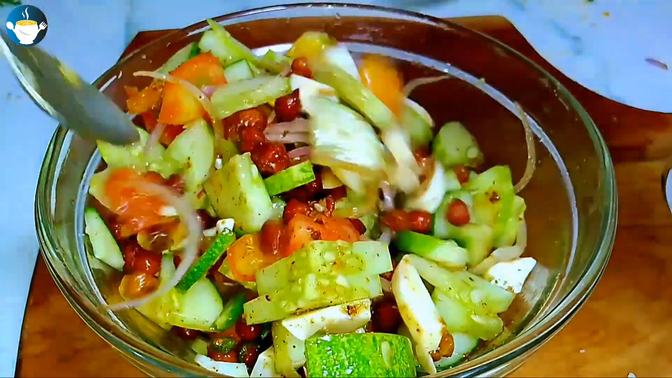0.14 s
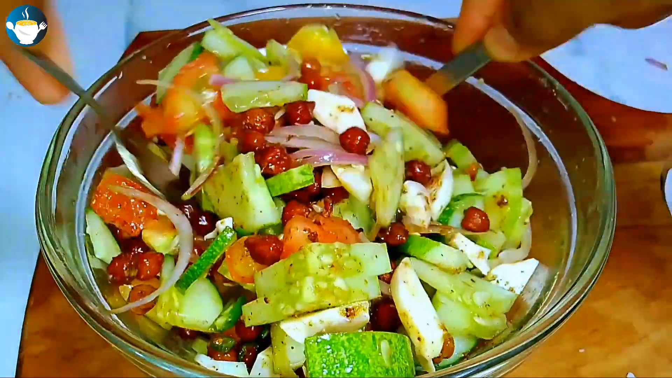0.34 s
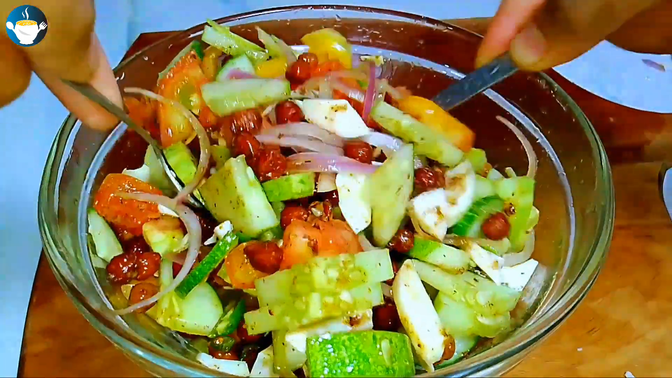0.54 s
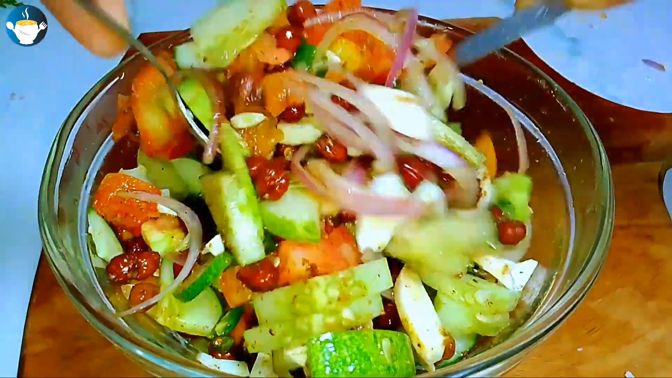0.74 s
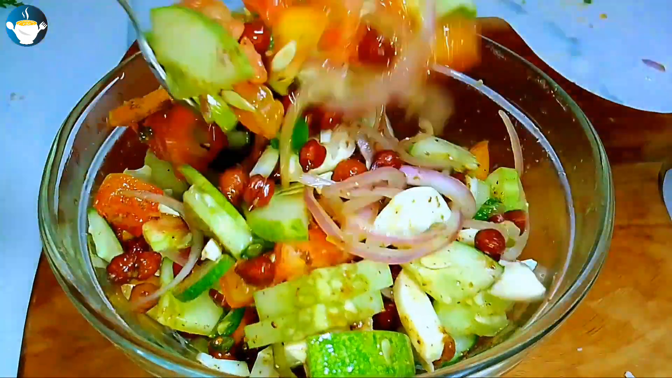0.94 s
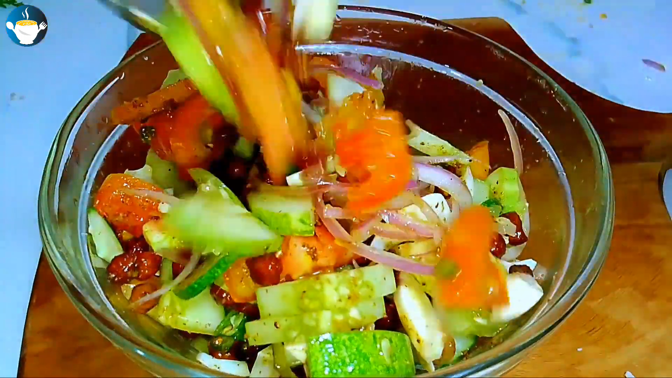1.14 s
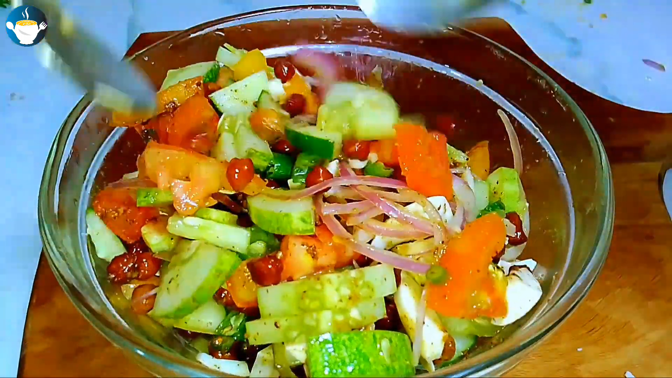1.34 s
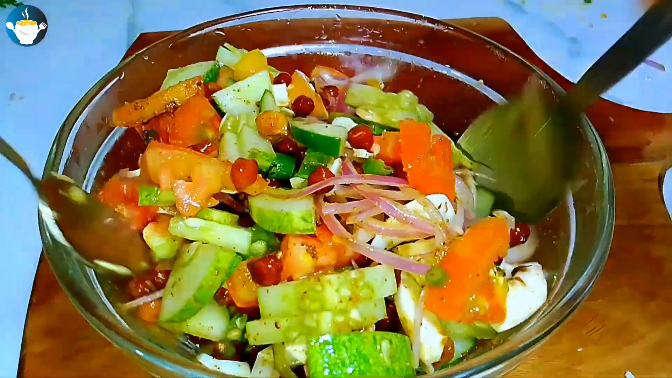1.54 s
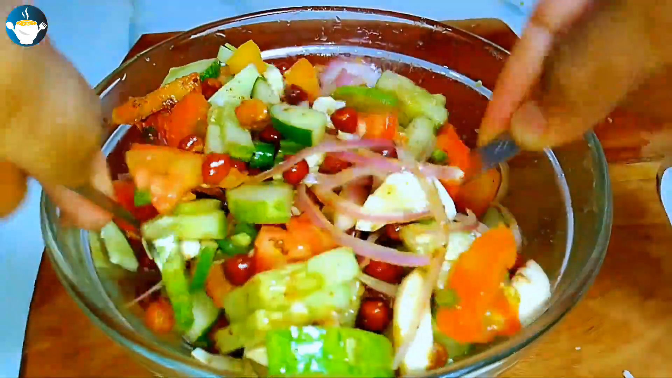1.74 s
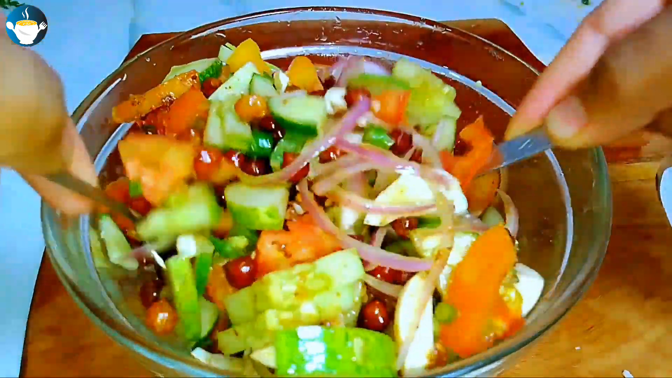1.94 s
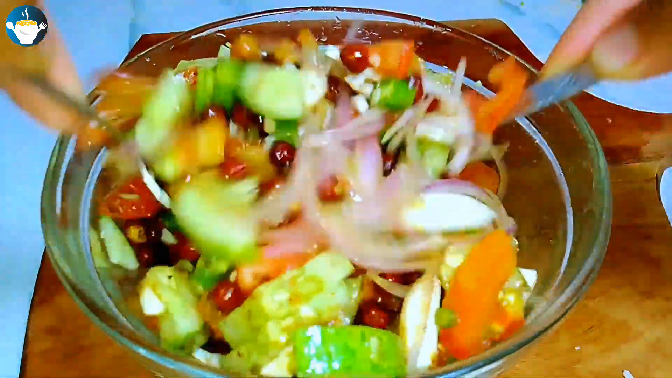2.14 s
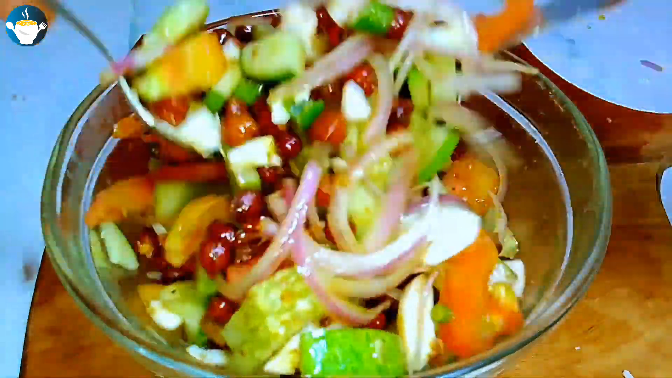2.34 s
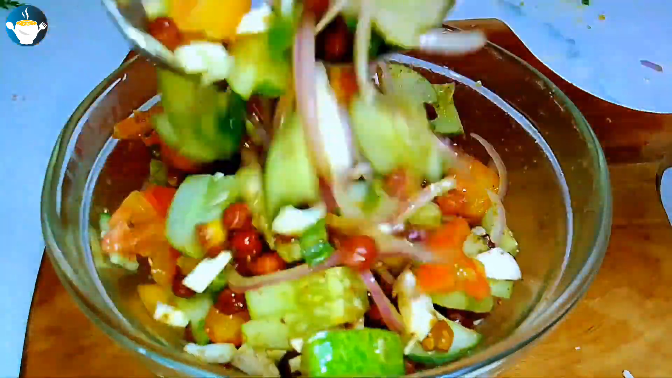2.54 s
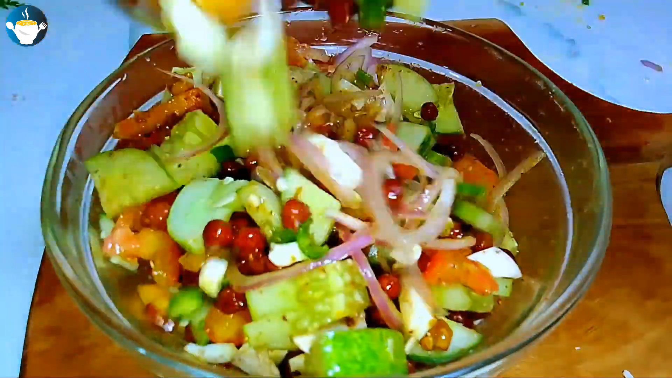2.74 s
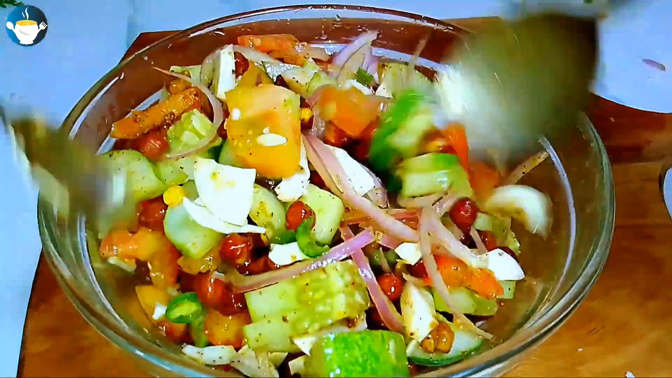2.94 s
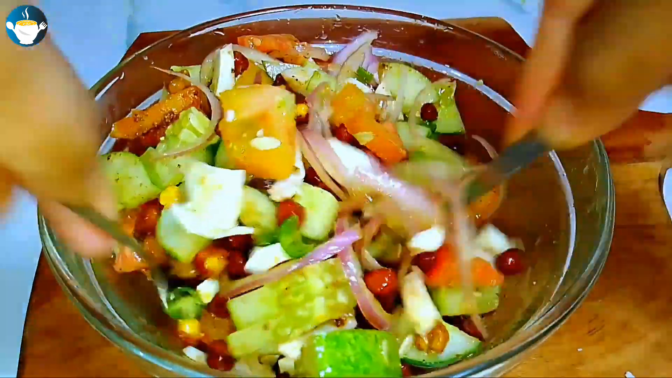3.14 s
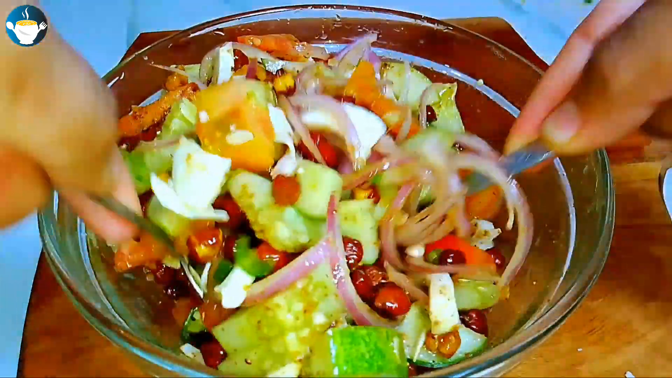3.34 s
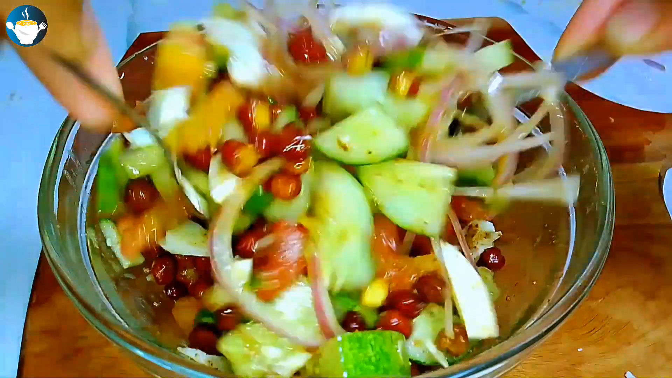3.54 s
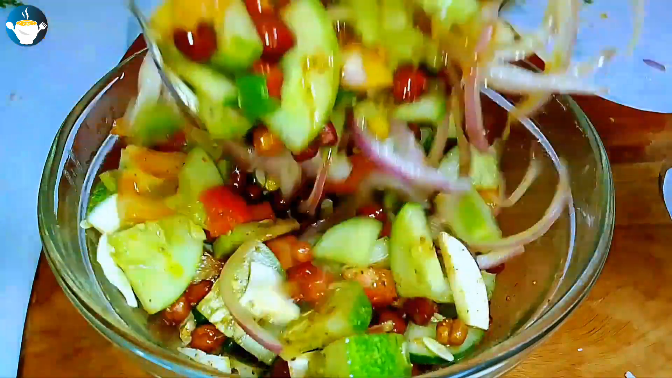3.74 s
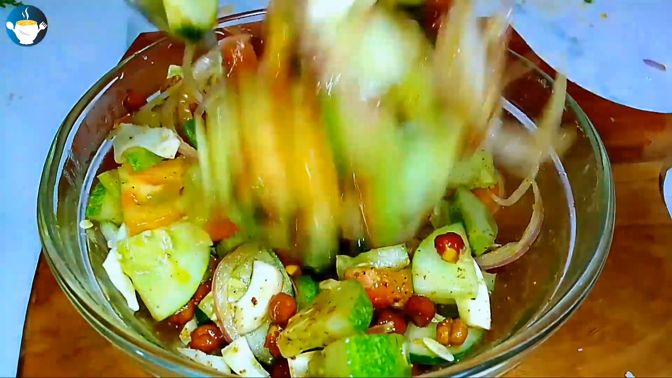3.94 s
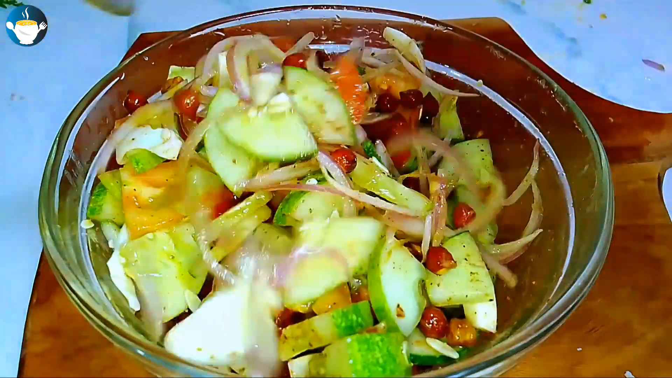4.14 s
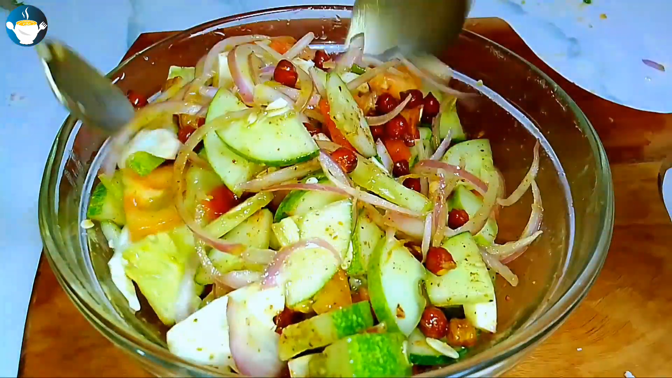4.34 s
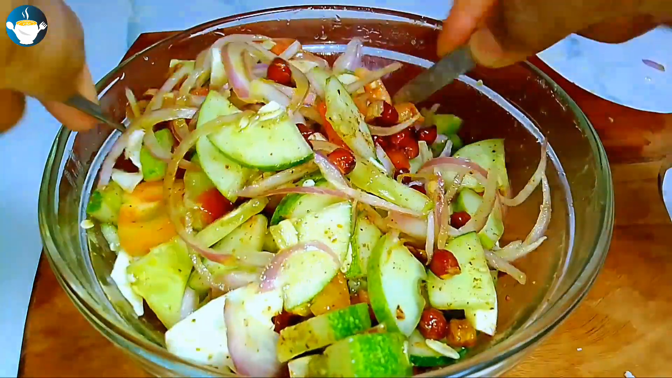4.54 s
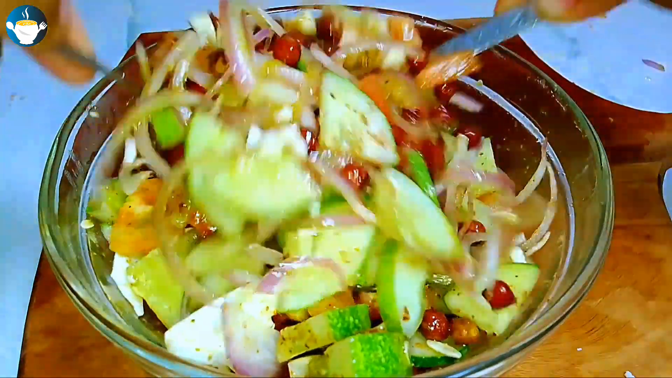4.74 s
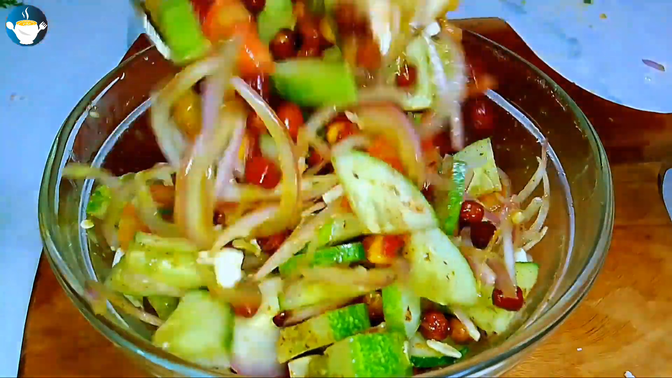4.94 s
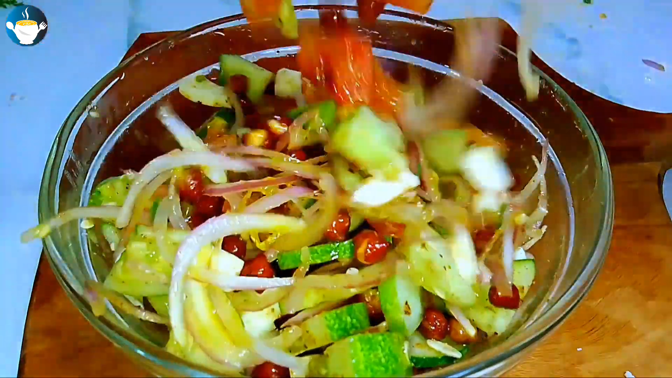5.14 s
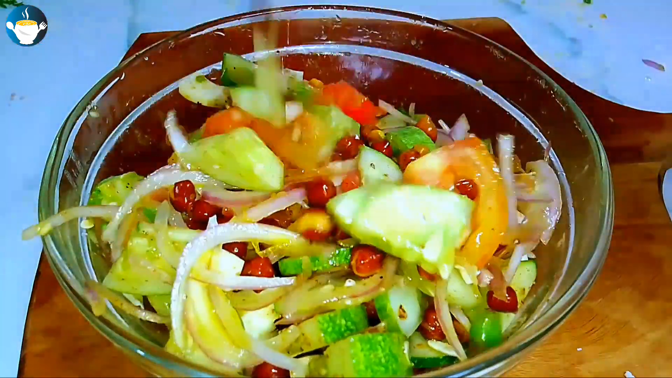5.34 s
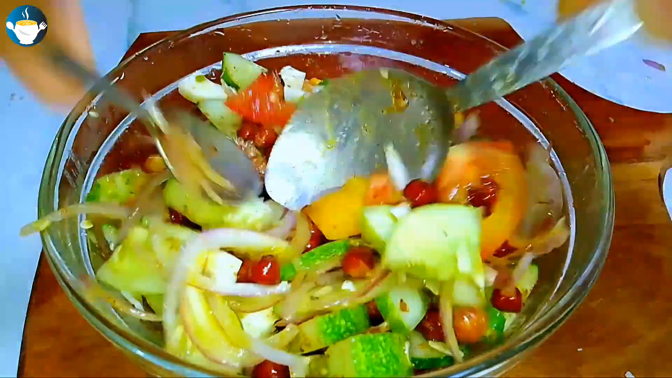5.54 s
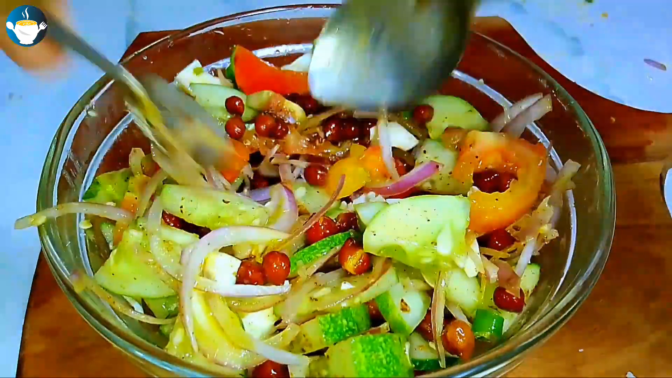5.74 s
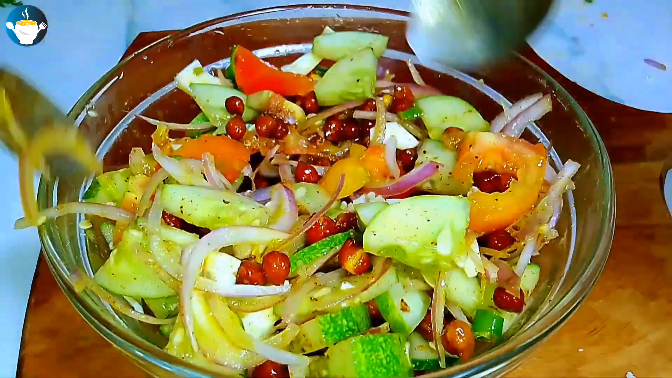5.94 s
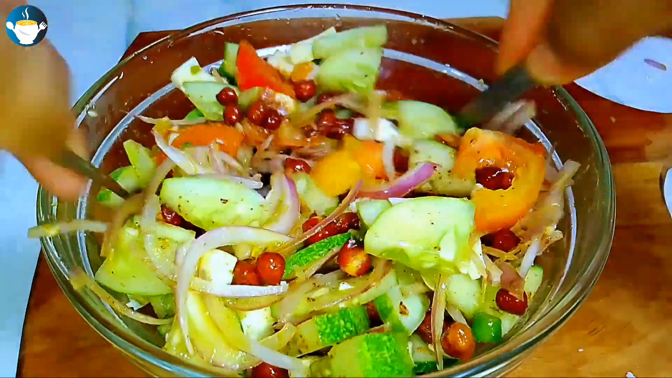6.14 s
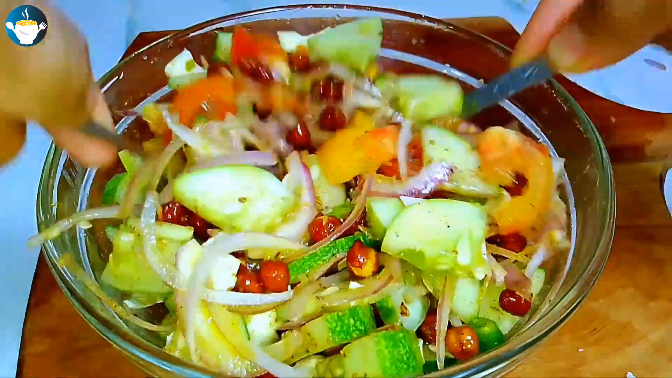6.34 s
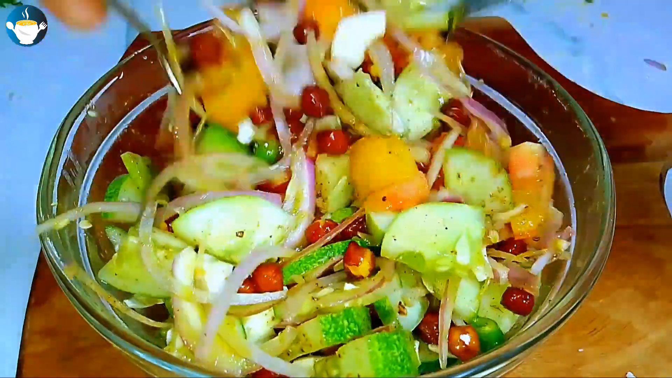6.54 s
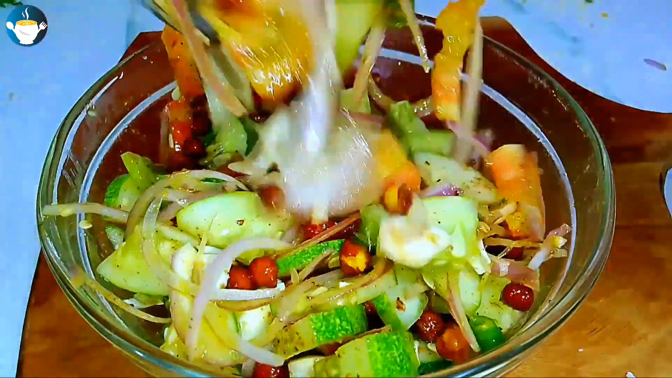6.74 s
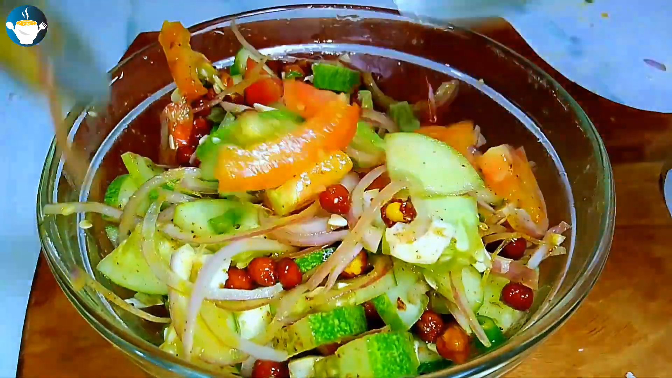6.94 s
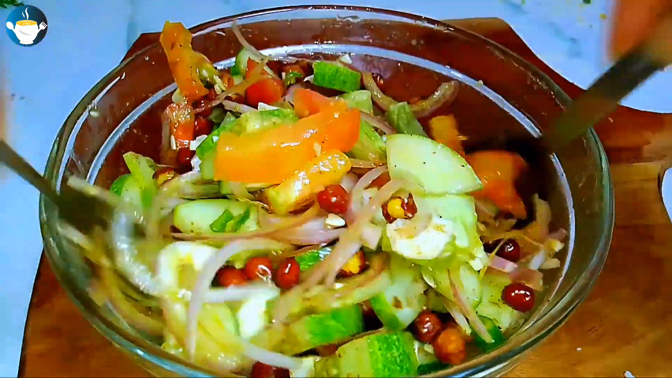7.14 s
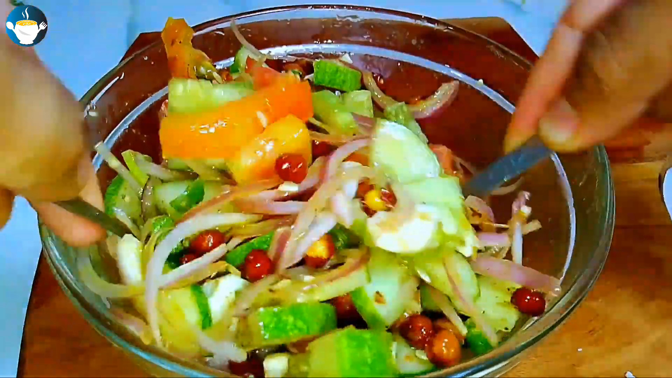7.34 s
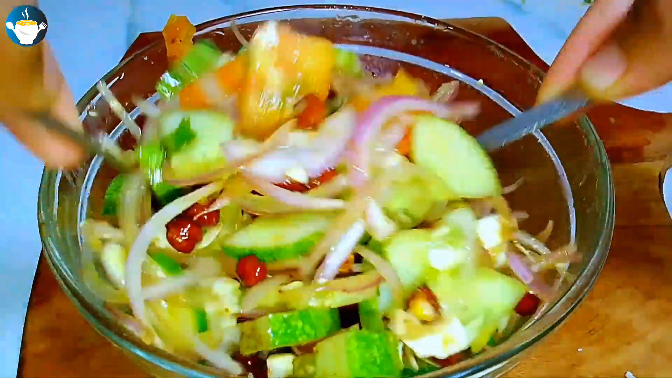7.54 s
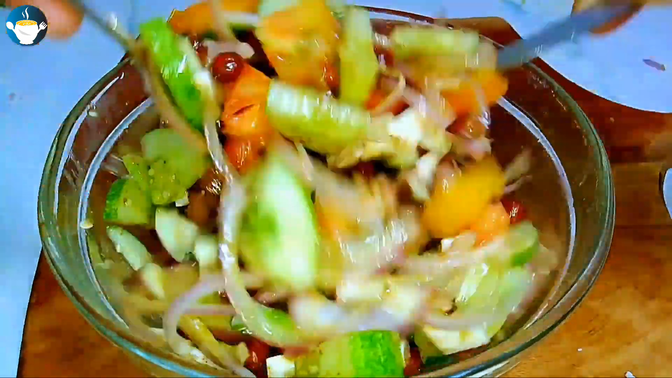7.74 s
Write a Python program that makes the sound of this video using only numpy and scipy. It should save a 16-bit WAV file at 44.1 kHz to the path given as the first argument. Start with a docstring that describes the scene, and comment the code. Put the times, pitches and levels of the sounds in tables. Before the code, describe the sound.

A faint distant hiss fills a hard-walled kitchen from the start and stays steady. At about 0.5 s a bright metal spoon clinks on a thick glass bowl, followed by a small dull knock. Near 1.7 s a loud, tight pair of clinks lands with a thud, the ring short and damped. Soft ticks of falling vegetable pieces follow around 2 and 2.5 s, with a muffled knock at 2.6 s. Another strong double clink comes at 3.2 s, then light ticks near 3.9 and 4.1 s. A somewhat softer pair sounds at 4.6 s, with faint taps after it. At 6.2 s a loud, bright pair strikes, followed by small muffled taps. A quick, weaker cluster of three clinks closes near 7.3 to 7.4 s. Every blow has quick echoes and a brief room tail; the top end is cut and the loudest peaks flattened.

```python
"""Two steel spoons toss chopped vegetables in a thick glass bowl on a board in a hard-walled kitchen.
From the start a faint distant hiss, shaped noise, fills the room and stays. A clink opens at 0.5 s; close groups
follow near 1.7, 3.2, 4.6, 6.2 and 7.4 s: damped sines at the bowl's modes, noise cracks and dull noise knocks.
Between them falling pieces tick the glass softly. Echoes and a diffuse tail of the room follow each blow.
The recorder is narrow-band and flattens the loudest peaks."""
import sys
import numpy as np
from scipy import signal
from scipy.fft import rfft, irfft
from scipy.io import wavfile
from scipy.ndimage import uniform_filter1d

SR = 44100
rng = np.random.default_rng(int(sys.argv[2]) if len(sys.argv) > 2 else 0)


def persist_wave(psi):
    """Save psi, clipped to +-1, as 16-bit WAV."""
    counts = np.round(np.clip(psi, -1, 1) * 32767).astype(np.int16)
    wavfile.write(sys.argv[1], SR, np.atleast_2d(counts).T)


def boost_factor(decibels):
    """Convert a level in decibels to a linear amplitude factor."""
    exponent = np.asarray(decibels, float) / 20
    return 10 ** exponent


N = 343083

# Ring modes of the bowl. Each row: nominal frequency in Hz, relative level in dB,
# t60 in seconds before the ring-length factor.
BOWL_MODES = [(740, -12.5, 0.28), (820, -5.5, 0.089), (910, 1.5, 0.09), (983.6, -5.5, 0.21),
              (1792.3, 5.5, 0.11), (1852, -2, 0.093), (2135, -5.5, 0.056), (2335, -14.5, 0.069),
              (2615, -17.5, 0.044), (2840, -31, 0.11), (3245, -23, 0.17), (3137, -5, 0.076),
              (3174, -11.5, 0.088), (3350, -8, 0.078), (3453, -29, 0.056), (4010, -13, 0.1),
              (4420, -8.5, 0.086), (4406, -15.5, 0.096), (4753, -1.5, .06), (4652, -9.5, 0.073),
              (4755, -0.5, 0.02), (4833, 4, 0.097), (4830, -38, 0.091), (5650, -16.5, 0.095),
              (6080, -9, 0.037), (6833, -1, 0.051)]
# Steel or hard pieces ring the glass; a hard contact is brighter, the place struck sets the main and low rings.
# Each row: start in seconds, strength in dB, brightness in dB per octave, main ring in dB, low ring in dB.
CLINKS = [(0.49, -36, 10, 22.5, 18.5), (1.7336, -31.5, 7, -1, 0), (1.7419, -27.5, 1, 24.5, 1),
          (2.0082, -59, -2, 17.5, -11), (2.4683, -69, -8, 24.5, -9), (2.8496, -70.5, -17.5, -5, -25),
          (3.01, -69.5, -2.5, 2, -0.5), (3.2311, -39, 0, 11.5, -6), (3.251, -26.5, 4.5, 17.5, -2),
          (3.9022, -60, -0.5, 16.5, -13), (4.0906, -69.5, -10.5, 4, -12), (4.6109, -34.5, 5, 16.5, -2.5),
          (4.6501, -36, 1, 19, -2.5), (5.027, -63.5, -5, 17.5, -4), (5.323, -80.5, -6, 35, -9),
          (5.9330, -75, -15.5, 13, -17), (6.2306, -30, 10, 17.5, 16.5), (6.2620, -31, 5.5, 17, 1.5),
          (7.315, -40.5, 6, 12.5, 13.5), (7.3568, -41.5, 1.5, 12, -1), (7.4187, -43, 1.5, 4, -5)]
# Dull knocks where food deadens the contact. Each row: start in seconds, level in dB, centre in Hz,
# fall below in dB per octave, fall above in dB per octave squared.
KNOCKS = [(0.563, -16, 2270, 14, 6), (1.7411, -8, 2300, 9, 16), (1.7987, -33, 2370, 1.5, -0.5),
          (2.4665, -41, 1300, 1.5, 12), (2.6252, -20.5, 2460, 6, 22), (3.25, -10.5, 2240, 6, 6.5),
          (4.6487, -19.5, 2310, 7, 1.5), (5.0994, -45, 1000, 5, 5), (6.2602, -11, 2690, 10, 7),
          (6.3851, -39.5, 3000, 2, 14), (6.794, -36.5, 1900, 3.5, 11), (7.3579, -13.5, 4030, 7, 48.5),
          (7.418, -22.5, 2380, 7.5, 11)]
# How a blow excites the other rings. Each row: frequency in Hz, level in dB.
UPPER_RINGS = [(1800, 1.5), (4870, 4), (6835, -4)]
# Spectrum of the contact crack. Each row: frequency in Hz, level in dB added to the colour of the blow.
CRACK_SPECTRUM = [(400, -27), (900, -17.5), (1500, -13), (2500, -6), (4000, -11), (5500, -14),
                  (7000, -12.5)]
# Decay of the diffuse room sound. Each row: frequency in Hz, t60 in seconds.
ROOM_T60 = [(300, 0.78), (800, 1), (2000, 0.67), (4000, 0.71), (7000, 0.61)]
# First echoes. Each row: delay in seconds, level in dB.
WALL_ECHOES = [(.0035, -8.5), (.008, -5.5), (.0125, -8.5), (.022, -14.5), (.031, -17.5)]
# Colour of the room hiss. Each row: frequency in Hz, relative density in dB per Hz.
HISS_SPECTRUM = [(25, -9), (60, -15.5), (110, -8), (165, -17.5), (220, -9), (400, -11), (800, -12),
                 (1300, -14), (2000, -10.5), (2700, -10.5), (3150, -5), (3700, -5), (4300, -14),
                 (5500, -23), (7300, -32.5)]

MAIN_HZ, LOW_HZ = 3130, 880
# Ring-length factors: a light tick leaves the glass free, a spoon damps it, one already resting on it more so.
FREE, ONE_SPOON, TWO_SPOONS = 1.77, 0.81, 0.68
LIGHT_DB, RESTING_S = -50, 0.1
HISS_RMS_DB = -57
BAND_EDGE_HZ = 7190


def spoons():
    """All blows on the bowl, with little bass below about 450 Hz."""
    out = np.zeros(N)
    modes = len(BOWL_MODES)
    draws = rng.standard_normal((len(CLINKS), modes + 800))
    gaps_s = np.diff([row[0] for row in CLINKS], prepend=-1)
    for (start_s, *blow), gap_s, draw in zip(CLINKS, gaps_s, draws):
        length = ring_length(blow[0], gap_s)
        add(out, start_s, clink(*blow, length, draw[:modes], draw[modes:]))
    puffs = rng.standard_normal((len(KNOCKS), 1500))
    for (start_s, *blow), puff in zip(KNOCKS, puffs):
        add(out, start_s, knock(*blow, puff))
    return signal.sosfilt(signal.butter(2, 450, "high", fs=SR, output="sos"), out)


def clink(strength_db, bright_db_per_octave, main_db, low_db, length, chance, puff):
    """Decaying sines at the bowl's modes, weighted by where and how it was hit, and a crack of the same colour."""
    hz, mode_db, t60_s = np.transpose(BOWL_MODES)[:, :, None]
    t = np.arange(12000) / SR
    rings = sorted(UPPER_RINGS + [(MAIN_HZ, main_db), (LOW_HZ, low_db)])
    colour = [(f, strength_db + db + bright_db_per_octave * np.log2(f / MAIN_HZ)) for f, db in rings]
    level_db = mode_db + read(colour, hz) + 2.5 * chance[:, None]
    pitch_hz = hz * (1 + 0.0025 * chance[::-1, None])  # the shifting load detunes the glass a little
    decay_db = -60 * t / (t60_s * max(length, 0.2))
    ring = (boost_factor(level_db + decay_db) * np.sin(2 * np.pi * pitch_hz * t)).sum(0)
    ring *= 1 - np.exp(-t / 0.00048)  # the contact lasts a moment
    crack = burst(lambda f: read(CRACK_SPECTRUM, f) + read(colour, f), 0.0033, puff)
    add(ring, 0, crack)
    return ring


def ring_length(strength_db, since_last_s):
    """Factor on t60: contact with a spoon drains the glass, a light tick does not."""
    if since_last_s < RESTING_S:
        return TWO_SPOONS
    return FREE if strength_db < LIGHT_DB else ONE_SPOON


def knock(level_db, centre_hz, below_db, above_db, puff):
    """Food deadens the contact: no ring, only a broad thud and click."""
    def colour(f):
        """Hump around the centre, in dB."""
        octaves = np.log2((f + 1) / centre_hz)
        below = below_db * np.minimum(octaves, 0)
        above = above_db * np.maximum(octaves, 0) ** 2
        return level_db + below - above
    return burst(colour, 0.033, puff)


def burst(colour, t60_s, puff):
    """Exponentially dying puff of noise, filtered to the given colour in dB over Hz."""
    dying = puff * boost_factor(-60 * np.arange(len(puff)) / SR / t60_s)
    x = np.pad(dying, (40, 1000))
    gain = boost_factor(colour(np.fft.rfftfreq(len(x), 1 / SR)))
    return irfft(rfft(x) * gain, len(x))[32:]


def read(points, hz):
    """Value of a spectrum table at hz, interpolated over log frequency."""
    f, value = np.transpose(points)
    return np.interp(np.log(hz + 1), np.log(f + 1), value)


def add(mix, start_s, sound):
    """Mixes a sound in at its start, cut at the end of the mix."""
    part = mix[round(start_s * SR):][:len(sound)]
    part += sound[:len(part)]


def kitchen(x):
    """A few single echoes, then sparse taps of random sign, each band dying at its own speed."""
    taps = np.zeros(SR)
    at = np.arange(500, SR - 20, 20)
    taps[at + rng.integers(0, 20, len(at))] = rng.choice([-1., 1.], len(at))
    taps *= np.clip(np.arange(SR) / SR / 0.025, 0, 1)  # the diffuse sound builds up
    hz, t, z = signal.stft(taps, SR, nperseg=256)
    decay = boost_factor(-60 * t / read(ROOM_T60, hz)[:, None])
    tail = signal.istft(z * decay, SR, nperseg=256)[1]
    tail *= boost_factor(-5.5) / np.linalg.norm(tail)
    for k, (delay_s, db) in enumerate(WALL_ECHOES):
        tail[round(delay_s * SR)] += (-1) ** k * boost_factor(db)
    return signal.fftconvolve(x, tail)[:N]


def hiss():
    """Steady room noise: random short-time spectra with faint drifting patches."""
    frames, hz = N // 512 + 5, np.fft.rfftfreq(2048, 1 / SR)
    real, imag, patches = rng.standard_normal((frames, 1025, 3)).T
    patches = uniform_filter1d(uniform_filter1d(patches, 30, 0), 8, 1)  # over bins, then frames
    level_db = read(HISS_SPECTRUM, hz)[:, None] + 0.66 * patches / patches.std()
    z = (real + 1j * imag) * boost_factor(level_db)
    x = signal.istft(z, nperseg=2048, noverlap=1536)[1][:N]
    return boost_factor(HISS_RMS_DB) * x / x.std()


def scene():
    """Blows, their room sound and the hiss."""
    blows = spoons()
    return (blows + kitchen(blows) + hiss())[None]


def top_cut(x):
    """Nothing passes above the cut-off."""
    return signal.sosfilt(signal.butter(12, 7480, fs=SR, output="sos"), x)


def record(dry):
    """Narrow band limit, overload that flattens the loudest peaks, and a small constant offset."""
    lowpass = signal.firwin(161, BAND_EDGE_HZ, window=("kaiser", 8), fs=SR)
    narrow = signal.oaconvolve(dry, lowpass[None], "same")
    mix = np.clip(narrow, -0.69, 0.69) + 0.0009
    return top_cut(mix)


dry = scene()
out = record(dry)
persist_wave(out)
```